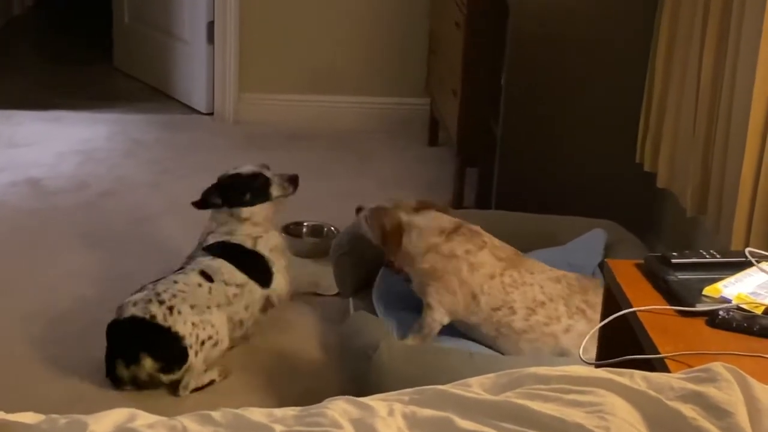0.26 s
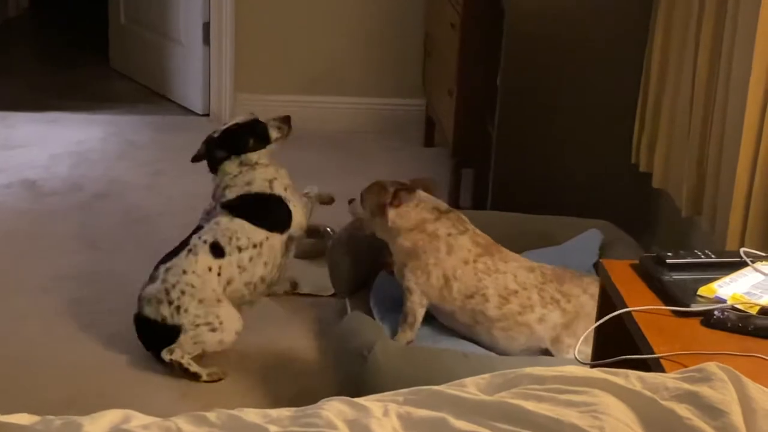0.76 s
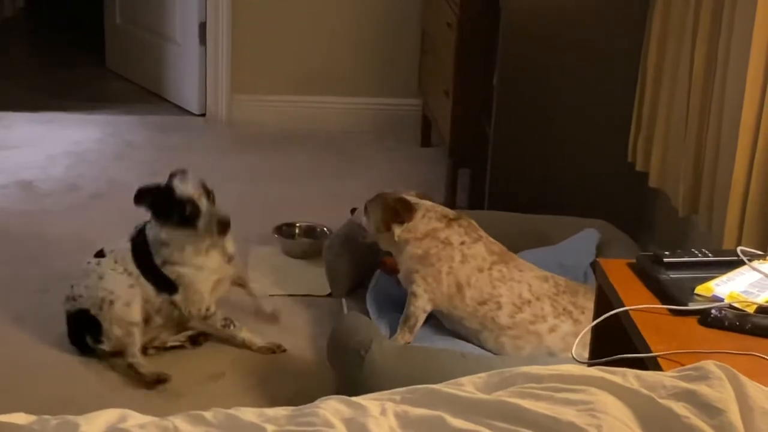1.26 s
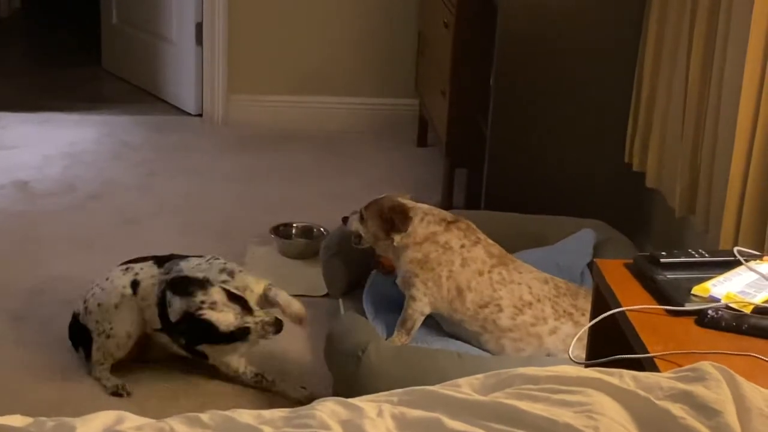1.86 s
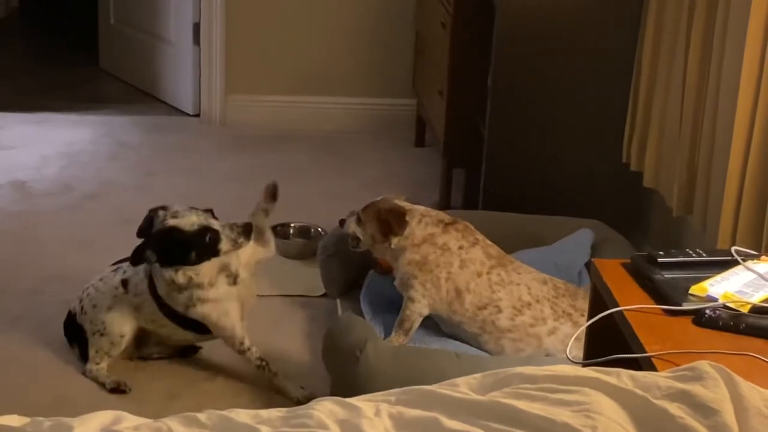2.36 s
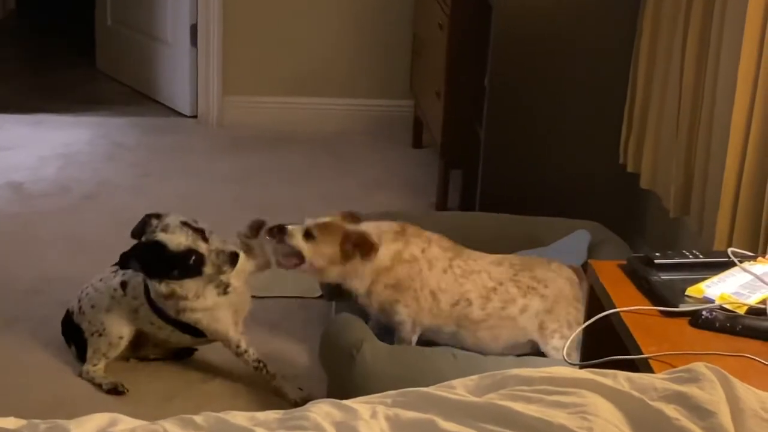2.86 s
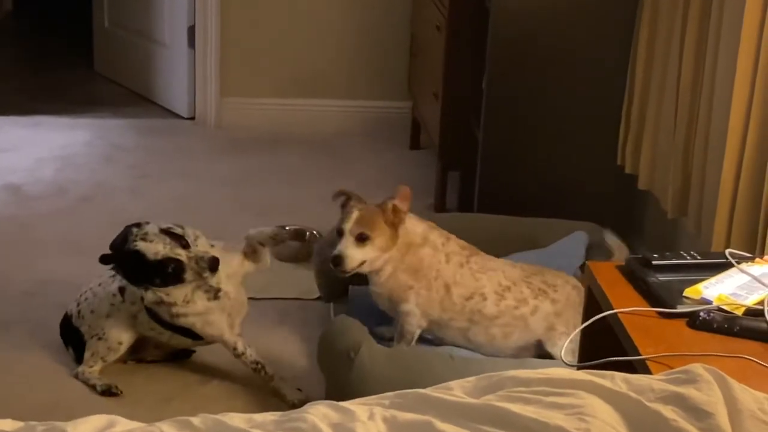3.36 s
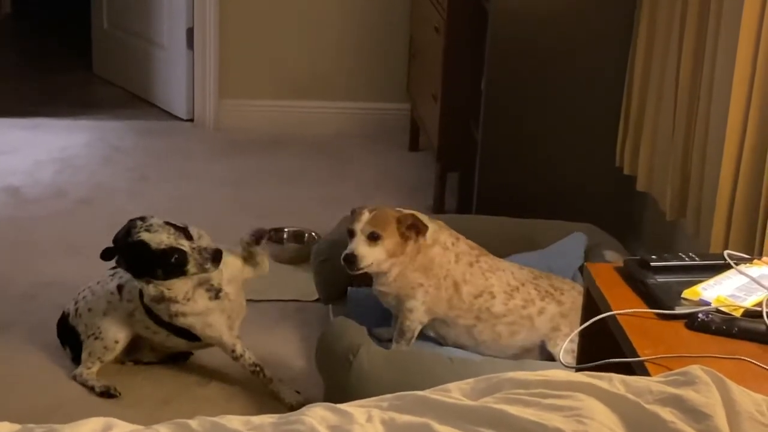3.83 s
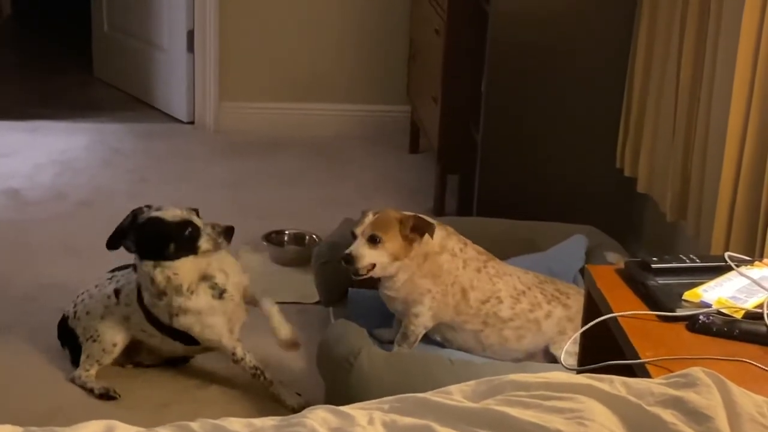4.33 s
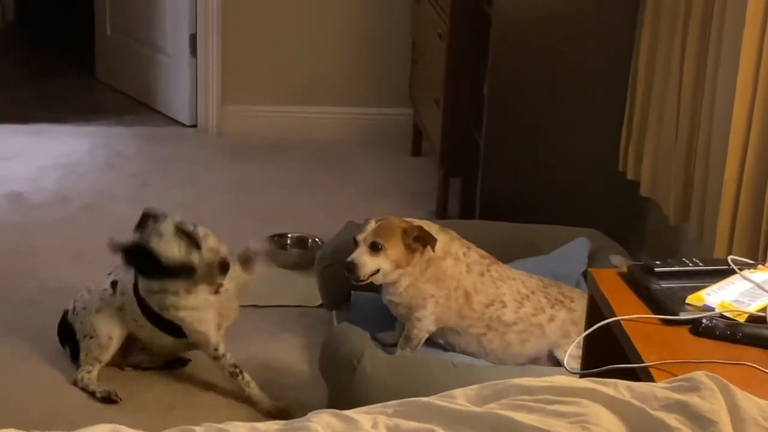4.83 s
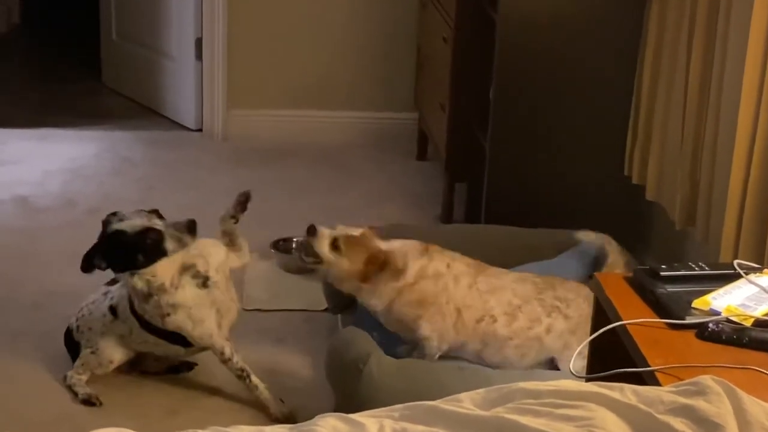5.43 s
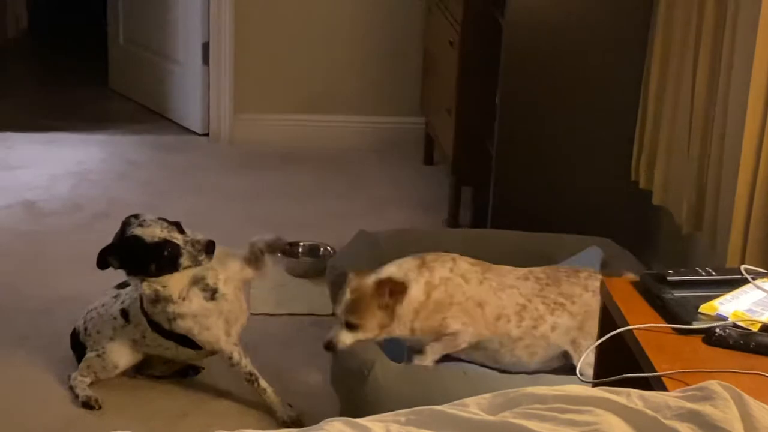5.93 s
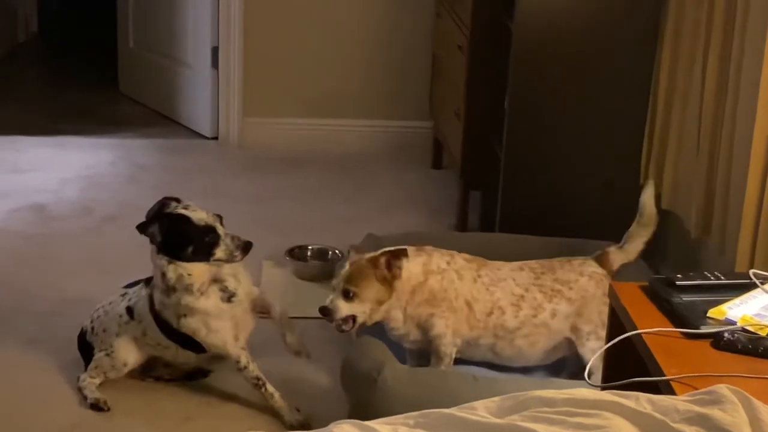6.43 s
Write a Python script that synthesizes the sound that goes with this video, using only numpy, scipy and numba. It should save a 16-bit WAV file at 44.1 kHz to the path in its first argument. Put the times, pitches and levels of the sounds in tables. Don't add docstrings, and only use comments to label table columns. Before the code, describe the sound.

Two small dogs play-fight indoors: sharp raspy yaps in a pair, then singly, over throaty rattling growls, nasal snorts, clicking teeth and dull floor thuds.

```python
import sys
import numpy as np
from scipy import signal
from scipy.fft import rfft, irfft, next_fast_len
from scipy.io import wavfile
from scipy.ndimage import uniform_filter1d
from numba import njit

SR = 44100
rng = np.random.default_rng(int(sys.argv[2]) if len(sys.argv) > 2 else 0)


def master(y):
    cut = np.clip(np.atleast_2d(y).T, -1, 1)
    pcm = np.round(cut * 32767)
    wavfile.write(sys.argv[1], SR, pcm.astype(np.int16))


def volts_from_db(level):
    exponent = np.asarray(level, float) / 20
    return 10 ** exponent


N = 295029

# [t/s, pitch f/Hz, level/dB, mouth f/Hz, lip f/Hz]
YAPS = [
    [(.112, 447.3, -45.5, 1150, 1750), (.14, 526.6, -13.5, 1150, 1840), (.155, 586.6, -12, 1190, 1670),
     (.172, 642, -8.5, 1170, 1650), (.19, 665.5, -15.5, 945, 1990), (.212, 680, -17, 930, 1680),
     (.232, 684, -27, 900, 1720), (.275, 476, -34, 520, 1770)],
    [(.382, 400, -37, 1100, 1483), (.408, 495.6, -23, 980, 1438), (.425, 576, -19, 1150, 1690),
     (.441, 593.6, -11.5, 1840, 1790), (.449, 622.3, -21.5, 1260, 1844), (.46, 653, -12, 1310, 2120),
     (.49, 688.5, -19.5, 1330, 2060), (.54, 499, -40.5, 586, 1620)],
    [(2.364, 481.4, -40, 950, 2120), (2.386, 539, -20, 1080, 2250), (2.413, 616.5, -11.5, 1214, 1820),
     (2.424, 631, -17, 1258, 2410), (2.438, 663.7, -15, 1050, 1980), (2.46, 729, -17.5, 1374, 1820),
     (2.48, 691.3, -25.5, 694, 2150), (2.52, 479, -28.5, 520, 2150)],
    [(3.038, 327, -52.5, 1000, 1980), (3.05, 340, -30.5, 990, 1990), (3.066, 462, -26, 970, 2000),
     (3.085, 595.5, -27.5, 580, 2340), (3.113, 808.4, -14, 830, 2340), (3.122, 851, -18.5, 850, 1570),
     (3.137, 943, -21.5, 930, 2380), (3.152, 996, -25.5, 960, 2380), (3.18, 1000, -28.5, 990, 2380)],
    [(5.078, 430.4, -50.5, 990, 2000), (5.097, 461, -25, 1010, 2000), (5.12, 570.5, -9.5, 1130, 2410),
     (5.134, 630.7, -15, 1208, 1870), (5.149, 652, -9, 965, 2230), (5.166, 696, -18.5, 1410, 1740),
     (5.19, 732, -16.5, 710, 1800), (5.24, 498, -38.5, 520, 2150)],
]
# [f/Hz, level/dB]
YAP_THROAT_DB = [(150, -65), (250, -30.5), (340, -31.5), (687, -5.5), (984, -9), (2090, -10), (2650, -18),
                 (3000, -30), (4800, -44), (7180, -37), (9450, -51), (15000, -45)]
# [t/s, width/s, half-pitch level/dB elsewhere, level/dB at break]
YAP_BREAKS = [(0.194, 0.066, -13.5, 0), (0.466, 0.021, -12.5, -6), (2.436, 0.014, -19.5, 0),
              (3.091, 0.02, -5.5, -31), (5.151, 0.021, -15.5, 10.5)]
# [start/dB per octave, loudest/dB per octave, end/dB per octave, cleanest rasp/dB]
YAP_JAWS = [(-2, 3, -7, -11), (-14.5, -0.5, -6, -9), (-15.5, 4, -8.5, -8), (-20, -9.5, -2.5, -10),
            (-3.5, 0, 5, -12.5)]
# [start f/Hz, end f/Hz, level/dB]
YAP_HISS = [(4308, 5600, -34), (5000, 7000, -29.5), (6500, 8400, -34.5), (3050, 4600, -32),
            (6480, 9000, -36)]
# [onset of singing/s, lip lift/0-4, lip breath level/dB]
YAP_HOARSE = [(0.044, 1.9, -20.5), (0.039, 1.95, -19.5), (0.025, 1.5, -15.5), (0.033, 1.2, -11),
              (0.017, 1.6, -19)]
RASP_START_DB, RASP_END_DB, CLEANEST_SHARE = 0.26, 1, 0.51

# [t/s, level/dB, lips drawn back/0-1]
GROWLS = [
    [(0, -61.5, 0), (.11, -50, 0.26)],
    [(.95, -87, 0.03), (1.06, -65.5, 0), (1.13, -54, 0.44), (1.27, -59, 0.03), (1.5, -64.5, 0.88),
     (1.9, -57.5, 0.89), (2.38, -56.5, 0.98)],
    [(2.75, -56, 0), (2.87, -61, 0.01), (3.03, -62.5, 0)],
    [(3.645, -97, 0.66), (3.67, -61, 0.91), (3.78, -92, 0.77)],
    [(4.42, -64.5, 0.63), (4.52, -61, 0.26), (4.6, -76, 0.35)],
    [(4.6, -87, 0), (4.66, -59, 0.36), (5.0, -61.5, 0.57), (5.07, -42, 0.15)],
    [(5.752, -66, 0.03), (5.79, -49, 0), (5.9, -73, 0.95), (6.08, -71.5, 1)],
    [(6.24, -65.5, 0.66), (6.5, -61, 0.22), (6.62, -90.5, 0.28)],
    [(6.65, -76, 0.28), (6.69, -45, 0.74)],
    [(.22, -69, .1), (.6, -55, 0.2), (1.0, -92.5, .1)],
    [(2.45, -65, 0.3), (2.6, -46, .1), (2.76, -82, 0.3)],
]
# [mouth f/Hz, throat level/dB, muzzle level/dB, teeth level/dB, flutter/0-1]
GROWL_POSTURES = [(910, -44, -12.5, -17, 0.7), (836, -64, -6.5, -23.5, 0), (990, -64, -4, -6, 0.05),
                  (830, -61, -15, -28, 0.13), (905, -74.5, -10, -26, 0.48), (887, -64, -32, -21.5, 1),
                  (813, -54.5, -21, -16.5, 0), (1080, -89.5, -6.5, -20.5, 0.28),
                  (900, -57.5, -31, -34, 0.5), (880, -62.5, -11.5, -26.5, 0.6),
                  (892, -58, -11.5, -19.5, 0.1)]
GROWL_THROAT_HZ = [290, 398, 400, 381, 386, 400, 400, 388, 385, 329.4, 340]
# [t/s, f/Hz]
MUZZLE_HZ = [(0, 2230), (1.1, 2320), (1.451, 2358), (1.72, 2410), (1.95, 2640), (2.35, 2660), (2.8, 2020),
             (3.1, 2020), (3.66, 2660), (4.45, 2296), (4.56, 2377), (5.0, 2310), (5.78, 2088), (6.08, 2434),
             (6.25, 2335), (6.5, 2153), (6.69, 2200)]
# [f/Hz, width/Hz, level/dB]
TEETH = [(3700, 1400, -2), (3600, 500, -3), (4280, 200, -5.5), (5130, 150, -4), (8060, 1200, -6.5),
         (11300, 1300, -15.5), (14800, 1500, -14.5)]
THROAT_FOLLOWS, LIPS_DB = 0.057, 15.5

# [first t/s, last t/s, rate/Hz, first level/dB, last level/dB]
FLUTTERS = [(2.745, 2.978, 19.4, -49.5, -56.5), (3.674, 3.762, 28, -53, -52),
            (3.824, 3.908, 21, -49.5, -57), (5.334, 5.399, 19, -47.5, -38), (5.45, 5.566, 19, -40, -54),
            (5.653, 5.693, 31, -55, -73), (5.772, 5.819, 21, -42.5, -39),
            (5.913, 6.078, 21.7, -42.5, -50.5), (6.129, 6.229, 23, -37, -60), (6.482, 6.58, 22, -56.5, -68)]
# [t/s, level/dB]
FLAPS = [(1.112, -43), (1.178, -48.5), (1.222, -51), (1.279, -46.5), (1.333, -46), (1.384, -44),
         (1.435, -47), (1.485, -46.5), (1.524, -46.5), (1.55, -57.5), (1.59, -46.5), (1.637, -46),
         (1.696, -47), (1.746, -47.5), (1.79, -50), (1.849, -50), (1.893, -48.5), (1.937, -51),
         (1.982, -54), (2.04, -48), (2.092, -47), (2.14, -49), (2.191, -46.5), (2.244, -45), (2.298, -47),
         (2.339, -52.5), (4.652, -50), (4.699, -49), (4.744, -45), (4.784, -48), (4.837, -48), (4.884, -46),
         (4.924, -48.5), (4.971, -51), (5.014, -48)]
# [t/s, level/dB]
GRUNTS = [(.128, -42), (0.383, -41), (0.617, -52), (0.743, -46), (.866, -63.5), (1.061, -54.5),
          (2.376, -42.5), (2.638, -48), (3.051, -50), (3.137, -70), (3.181, -52.5), (4.526, -62),
          (4.624, -57.5), (5.094, -41.5), (6.684, -50.5)]
# [t/s, f/Hz]
CHEST_HZ = [(0, 167.9), (1.1, 143.7), (1.216, 182.1), (1.331, 157.2), (1.5, 146.5), (1.8, 157),
            (2.381, 165.8), (2.759, 135), (3.2, 148.3), (3.801, 137.6), (4.628, 147.4), (5.05, 152),
            (5.389, 165.5), (5.463, 124.6), (5.772, 119.8), (5.908, 219.6), (6.04, 140.1), (6.69, 131.5)]
# [t/s, share/0-1]
RATTLE_SHARE = [(0, .15), (1.05, .3), (1.25, .1), (2.35, .15), (3.2, .35), (4.6, .15), (5.1, .15),
                (5.7, .3), (5.8, .42), (6.1, .4), (6.3, .3), (6.69, .3)]
FLAP_JITTER_S, FLAP_SPREAD_DB = .002, 1.5
OPEN_S, FLAP_KNOCK = .029, 9.8
HUM_SHARE = .1

# [peak t/s, level/dB, 20 dB rise/s, 20 dB fall/s, brightness/dB up above 1700 Hz and down
SNORTS = [
    (.76, -48.5, 0.083, 0.043, -4.5),
    (1.1, -62, 0.073, 0.44, 1),
    (3.83, -36.5, 0.052, 0.072, 5),
    (4.55, -68, 0.23, 0.089, 10),
    (5.082, -48, 0.056, 0.042, -1),
    (5.5, -52.5, 0.36, 0.13, -8),
    (5.665, -53.5, .15, 0.15, 1),
    (5.798, -54, 0.084, 0.11, 7),
    (6.139, -34.5, 0.056, 0.05, 3),
]
# [lower f/Hz, upper f/Hz, lift/dB]
NOSTRILS = [(1602, 5080, 4), (1650, 4930, 11), (1690, 4540, 2), (1650, 4900, -5), (1670, 7300, -9.5),
            (1640, 2080, 6.5), (1670, 5500, -4), (1150, 2900, 7.5), (1200, 1960, 1.5)]
# [f/Hz, level/dB per Hz]
NOSE_DB = [(200, -21), (400, -5), (800, -3.5), (1200, -3.5), (1700, -6), (2200, -6), (2800, -8),
           (4700, -10), (6000, -12.5), (8000, -18), (11000, -21), (15000, -39)]
# [t/s, pitch f/Hz, level/dB, width/Hz]
WHISTLES = [
    [(1.04, 5100, -78, 350), (1.14, 5420, -74, 350), (1.47, 5400, -86, 350)],
    [(1.08, 4500, -80, 350), (1.19, 4550, -75, 350), (1.3, 4500, -86, 350)],
    [(4.63, 4130, -91, 78), (4.682, 4120, -67.5, 78), (4.77, 4070, -77.5, 78)],
    [(5.02, 3790, -78.5, 78), (5.036, 4200, -72, 78), (5.09, 3989, -68, 78)],
]
SNORT_RANGE_DB, SNORT_DULLS = 30, 0.27

# [t/s, level/dB, pitch f/Hz, ring/ms, crack level/dB]
SNAPS = [
    (0.64, -44, 2127, 23, -12),
    (2.661, -23, 2950, 7.9, -8),
    (2.72, -34, 2204, 10.7, -21.5),
    (2.846, -26.5, 3003, 10, -6.5),
    (2.851, -26.5, 780, 15, -28.5),
    (4.611, -47.5, 1040, 32, -9),
    (4.765, -52.5, 1687, 38, -16.5),
    (5.492, -28, 3160, 6.3, -15.5),
    (5.504, -37, 4530, 7.8, -19),
    (5.764, -51, 965, 13, -7),
]

# [t/s, level/dB]
RUMBLE_DB = [(0.0, -66), (1.12, -63.5), (2.1, -67.5), (2.76, -60.5), (3.22, -63.5), (3.48, -86),
             (3.87, -53.5), (4.1, -92), (4.42, -85.5), (4.55, -60.5), (5.18, -69), (5.23, -67), (5.79, -55),
             (5.98, -63.5), (6.17, -47), (6.39, -83), (6.56, -56.5), (6.69, -83.5)]
# [f/Hz, level/dB]
THUMP_DB = [(15, -45.0), (30, -16), (50, -7.5), (66, -3.5), (100, 5.0), (130, -44.5), (300, -87.5)]
# [f/Hz, level/dB per Hz]
HUSH_SPECTRUM_DB = [(24, -29), (40, 0), (70, -0.5), (110, -7.5), (233, -8), (355, -12.5), (676, -18),
                    (956, -13.5), (1260, -24), (2520, -22.5), (4340, -31), (15000, -47)]
HUSH_DB = -72.5

# [f/Hz, T60/s]
ROOM_T60_S = [(100, 0.94), (300, 1), (700, 0.62), (1400, 0.63), (3500, 0.61), (8000, 0.62), (15000, 0.76)]
# [f/Hz, side level/dB]
ROOM_SIDE_DB = [(60, -15.5), (200, -11.5), (400, -8.5), (800, -6), (1400, -6), (2500, -13), (4400, -34),
                (7000, -31.5), (10000, -13)]
# [f/Hz, level/dB, T60/s]
ROOM_MODES = [(687, -73.5, 0.89), (800, -75.5, 0.53), (965, -74.5, 0.65), (1326, -75.5, 1),
              (1430, -75.5, .7), (1690, -73.5, 0.97), (1790, -73.5, .7), (2060, -76.5, 0.6),
              (2150, -73.5, .65), (2380, -75.5, 0.74)]
MODE_BLUR_HZ = 10

TURN_FROM_HZ, TURN_HZ, CUTOFF_HZ = 6950, 4320, 16000


def at_hz(points, hz):
    p = np.array(points)
    return np.interp(np.log(np.maximum(hz, 1)), np.log(p[:, 0]), p[:, 1])


def rms_one(x):
    return x / np.sqrt(np.mean(x ** 2) + 1e-20)


def span(rows, fade_s=.01):
    s, *columns = np.transpose(rows)
    start = round(s[0] * SR)
    t = np.arange(start, min(round(s[-1] * SR), N)) / SR
    gate = np.clip(np.minimum(t - s[0], s[-1] - t) / fade_s, 0, 1)
    return slice(start, start + len(t)), gate, [np.interp(t, s, c) for c in columns]


def butter(x, order, hz, kind="low"):
    return signal.sosfilt(signal.butter(order, hz, kind, fs=SR, output="sos"), x)


def coloured(points, size):
    hz = np.fft.rfftfreq(size, 1 / SR)
    gain = volts_from_db(at_hz(points, np.minimum(hz, 12000)))
    return rms_one(irfft(rfft(rng.standard_normal(size)) * gain, size))


def tilted(x, shelf_db, pivot_hz):
    low = butter(x, 1, pivot_hz)
    return low * volts_from_db(-shelf_db) + (x - low) * volts_from_db(shelf_db)


def drift(size, rate_hz):
    r = np.exp(-2 * np.pi * rate_hz / SR)
    return rms_one(signal.lfilter([1], [1, -2 * r, r * r], rng.standard_normal(size + 2000))[2000:])


@njit
def resonate(x, hz, width_hz, sr):
    y, r = np.zeros(len(x)), np.exp(-np.pi * width_hz / sr)
    for i in range(2, len(x)):
        drive = (1 - r * r) / 2 * (x[i] - x[i - 2])
        y[i] = drive + 2 * r * np.cos(2 * np.pi * hz[i] / sr) * y[i - 1] - r * r * y[i - 2]
    return y


def formant(x, hz, width_hz):
    hz = hz + np.zeros(len(x))
    return resonate(resonate(x, hz, float(width_hz), SR), hz, float(width_hz), SR)


def background():
    at, gate, (level_db,) = span(RUMBLE_DB, fade_s=1e-4)
    lumps = np.zeros(N)
    lumps[at] = volts_from_db(level_db) * coloured(THUMP_DB, len(gate))
    side = volts_from_db(HUSH_DB - 12.5) * coloured(HUSH_SPECTRUM_DB, N) + .06 * np.roll(lumps, 300)
    return lumps + volts_from_db(HUSH_DB) * coloured(HUSH_SPECTRUM_DB, N) + side * np.array([[1], [-1]])


def growl(opens, opened):
    cycle = np.cumsum(120 * (1 + .2 * drift(N, 60))) / SR
    pulses = np.diff(np.floor(cycle), prepend=0) * volts_from_db(3.0 * rng.standard_normal(N))
    source = rms_one(pulses) + 1.3 * rng.standard_normal(N)
    clicked = source + 45 * opens
    out = np.zeros(N)
    for rows, posture, throat_hz in zip(GROWLS, GROWL_POSTURES, GROWL_THROAT_HZ):
        mouth_hz, throat_db, muzzle_db, teeth_db, flutter = posture
        at, gate, (level_db, lips) = span(rows, fade_s=0.0049)
        size, air = len(gate), source[at]
        throat_db = throat_db + THROAT_FOLLOWS * (level_db - level_db.max()) - level_db
        muzzle_hz = np.interp(np.arange(at.start, at.stop) / SR, *np.transpose(MUZZLE_HZ))
        teeth_db = teeth_db + LIPS_DB * lips
        flutter = np.clip(flutter, 0, .95)
        valve = 1 - flutter + 2.5 * flutter * opened[at]

        knocked = air + FLAP_KNOCK * flutter * opens[at]
        mouth = formant(knocked, mouth_hz, 240 - 140 * flutter)
        mouth = rms_one(mouth + (1 - flutter) ** 2 * .8 * formant(air, .78 * mouth_hz, 750))
        mouth = butter(mouth, 4, 1400)

        throat = formant(air, throat_hz * (1 + 0.026 * drift(size, 4.8)), 80) * volts_from_db(2 * drift(size, 5.8))
        throat = rms_one(throat + 0.69 * formant(air, 210, 190) + 0.21 * formant(air, 500, 310))

        muzzle = formant(air, muzzle_hz * (1 + 0.013 * drift(size, 11)), 400) * volts_from_db(1.5 * drift(size, 15))
        muzzle = rms_one(muzzle + 0.37 * formant(air, 0.86 * muzzle_hz, 920))

        teeth = sum(volts_from_db(db + 2.5 * drift(size, 6)) * formant(clicked[at], hz, width_hz)
                    for hz, width_hz, db in TEETH)
        teeth = butter(teeth, 3, [5700, 7400], "bandstop")
        teeth = rms_one(butter(teeth, 5, 3000, "high"))

        voice = valve * (mouth + volts_from_db(throat_db) * throat)
        voice = voice + volts_from_db(muzzle_db - 2.5 * lips + 1.0) * muzzle + volts_from_db(teeth_db) * teeth
        out[at] += gate * volts_from_db(level_db - 1.5) * voice
    return out


def yaps():
    out = np.zeros(N)
    for rows, brk, jaw, hiss, hoarse in zip(YAPS, YAP_BREAKS, YAP_JAWS, YAP_HISS, YAP_HOARSE):
        break_s, break_width_s, plain_db, broken_db = brk
        *jaw_db, clean_db = jaw
        *hiss_hz, hiss_db = hiss
        sing_s, lip_lift, breath_db = hoarse
        at, gate, (hz, level_db, mouth_hz, lip_hz) = span(rows, fade_s=.008)
        size = len(hz)
        hz = uniform_filter1d(hz, size=420, mode="nearest")
        t, part = np.arange(at.start, at.stop) / SR, np.linspace(0, 1, size)
        half_db = plain_db + (broken_db - plain_db) * np.exp(-((t - break_s) / break_width_s) ** 2)
        open_db = np.interp(part, [0, part[np.argmax(level_db)], 1], jaw_db)
        rasp_db = np.interp(part, [0, CLEANEST_SHARE, 1], [RASP_START_DB, clean_db, RASP_END_DB])
        half_turn = np.cumsum(np.pi * hz * (1 + .003 * drift(size, 90))) / SR

        lines, power = 0, 0
        for k in range(1, 25):
            line_hz = k * hz / 2
            tilt_db = open_db * np.log2(line_hz / 1000)
            gain = volts_from_db(at_hz(YAP_THROAT_DB, line_hz) + half_db * (k % 2) + tilt_db)
            mouth_lift = 2.8 / (1 + ((line_hz - mouth_hz) / 130) ** 2)
            gain = gain * (1 + mouth_lift + lip_lift / (1 + ((line_hz - lip_hz) / 120) ** 2))
            gain = gain * volts_from_db(2 * drift(size, 62))
            lines = lines + gain * np.sin(k * half_turn + 2 * np.pi * rng.random())
            power = power + gain ** 2 / 2

        puffs = coloured(YAP_THROAT_DB, size) * (1 + 0.75 * np.cos(2 * half_turn))
        mouth_puffs = 4.6 * formant(puffs, mouth_hz, 180)
        puffs = volts_from_db(0.5 * drift(size, 60)) * tilted(puffs, 21.46, 3000) + mouth_puffs

        sings = np.clip((t - t[0]) / sing_s, 0, 1) ** 2
        breath = rng.standard_normal(size) * volts_from_db(2.2 * drift(size, 120))
        hoarse_air = (1 - sings) * rms_one(formant(breath, mouth_hz, 280))
        hoarse_air = hoarse_air + volts_from_db(breath_db) * rms_one(formant(breath, lip_hz, 210))
        lines = sings * lines + np.sqrt(power) * hoarse_air

        voice = lines / np.sqrt(uniform_filter1d(power, 400))
        voice = voice + volts_from_db(np.minimum(rasp_db, 0) - 18.0) * puffs
        teeth_air = formant(rng.standard_normal(size), np.interp(part, [0, 1], hiss_hz), 900)
        voice = voice + volts_from_db(hiss_db) * rms_one(teeth_air)
        out[at] += gate * volts_from_db(level_db - 0.5) * voice
    return butter(out, 2, 300, "high")


def flaps():
    rows = []
    for first_s, last_s, rate_hz, *ends_db in FLUTTERS:
        for s in np.linspace(first_s, last_s, round((last_s - first_s) * rate_hz) + 1):
            level_db = np.interp(s, [first_s, last_s], ends_db) + FLAP_SPREAD_DB * rng.normal()
            rows.append((s + FLAP_JITTER_S * rng.normal(), level_db))
    return rows + FLAPS + GRUNTS


def throbs():
    swells, opens = np.zeros(N + 8000), np.zeros(N + 8000)
    t = np.arange(-4000, 4000) / SR
    swell = .82 * np.exp(-(t / .0135) ** 2) + .18 * np.exp(-(t / .028) ** 2)
    times = flaps()
    for (s, peak_db), late in zip(times, rng.random(len(times))):
        i = max(round(s * SR) - 4000, 0)
        swells[i:i + 8000] += volts_from_db(peak_db) * swell
        opens[i + 4000 + round(SR * (.004 + .002 * late))] = 1
    opened = signal.fftconvolve(opens, np.exp(-(t[4000:] / OPEN_S) ** 2))[:N]
    swells = (1 - HUM_SHARE) * swells + HUM_SHARE * uniform_filter1d(swells, size=2200)

    at_s = np.arange(N) / SR
    hz = np.interp(at_s, *np.transpose(CHEST_HZ))
    turn = np.cumsum(2 * np.pi * hz * (1 + .022 * drift(N, 30))) / SR
    windpipe = rms_one(formant(rng.standard_normal(N), 180, 97))
    rattle = np.interp(at_s, *np.transpose(RATTLE_SHARE))
    rattling = rms_one(formant(rng.standard_normal(N), 170, 170))
    chest = swells[:N] * ((1 - rattle) * np.sin(turn) + .6 * rattle * rattling + .12 * windpipe)
    return chest, opens[:N], uniform_filter1d(np.clip(opened, 0, 1), size=60)


def snaps():
    out, t = np.zeros(N), np.arange(3000) / SR
    for s, peak_db, hz, ring_ms, crack_db in SNAPS:
        crack = volts_from_db(crack_db) * rng.standard_normal(len(t)) * volts_from_db(-60 * t / 0.011)
        ring = .5 * np.sin(2 * np.pi * hz * t) * volts_from_db(-60000 * t / ring_ms)
        start = round(s * SR)
        out[start:start + len(t)] += volts_from_db(peak_db) * (crack + ring)
    return butter(out, 2, [400, 6500], "band") + .06 * np.diff(out, prepend=0)


def snorts():
    out = np.zeros(N)
    reach = SNORT_RANGE_DB / 20
    for (s, peak_db, rise_s, fall_s, peak_bright_db), (low_hz, high_hz, lift_db) in zip(SNORTS, NOSTRILS):
        low_db = peak_db - SNORT_RANGE_DB
        rows = [(s - reach * rise_s, low_db), (s, peak_db), (s + reach * fall_s, low_db)]
        at, gate, (level_db,) = span(rows)
        level_db = uniform_filter1d(level_db, size=1300, mode="nearest")
        bright_db = peak_bright_db + SNORT_DULLS * (level_db - peak_db)
        air = tilted(coloured(NOSE_DB, len(gate)), bright_db, 1700)
        air = air + volts_from_db(lift_db) * (formant(air, low_hz, 610) + 0.56 * formant(air, high_hz, 1300))
        out[at] += gate * volts_from_db(level_db - 8.0 + 1.6 * drift(len(gate), 70)) * air
    for rows in WHISTLES:
        at, gate, (hz, level_db, width_hz) = span(rows, fade_s=0.012)
        whistle = rms_one(formant(rng.standard_normal(len(hz)), hz, width_hz.mean()))
        out[at] += gate * volts_from_db(level_db) * whistle
    return out


def room(x, wet_db):
    t, tail = np.arange(SR) / SR, 0
    edges_hz = 50 * 2 ** np.arange(0, 8.5, .5)
    for low, high in zip(edges_hz, edges_hz[1:]):
        band = butter(rng.standard_normal((2, SR)), 2, [low, high], "band")
        tail = tail + band * volts_from_db(-60 * t / at_hz(ROOM_T60_S, np.sqrt(low * high)))
    early = 1 + 4.5 * np.exp(-t / 0.016)
    tail = tail * np.clip((t - .003) / 0.0049, 0, 1) * early
    tail = volts_from_db(wet_db) * tail / np.sqrt(np.sum(tail[0] ** 2))
    for hz, level_db, t60_s in ROOM_MODES:
        blur = .75 + .6 * np.array([drift(SR, MODE_BLUR_HZ), drift(SR, MODE_BLUR_HZ)])
        wave = np.sin(2 * np.pi * (hz * t + rng.random((2, 1))))
        tail = tail + blur * volts_from_db(level_db - 60 * t / t60_s) * wave
    size = next_fast_len(N + SR)
    wide = volts_from_db(at_hz(ROOM_SIDE_DB, np.fft.rfftfreq(size, 1 / SR)) + 4.0)
    mid, side = rfft(x, size) * rfft(tail, size)
    mid, side = x + irfft(mid, size)[:N], irfft(side * wide, size)[:N]
    return np.array([mid + side, mid - side])


def scene():
    chest, opens, opened = throbs()
    dogs = yaps() + growl(opens, opened) + snorts() + snaps()
    return room(dogs + 0.64 * chest, wet_db=-6.0) + 0.77 * chest + background()


def top_cut(x):
    return signal.sosfilt(signal.butter(12, 16460, fs=SR, output="sos"), x)


def record(dry):
    level_db = 10 * np.log10(uniform_filter1d(np.mean(dry ** 2, axis=0), size=2000) + 1e-12)
    x = dry * volts_from_db(np.clip(0.3 * (level_db + 53.0), -8.0, 0))
    hz = np.fft.rfftfreq(N, 1 / SR)
    turn = np.pi * np.maximum(hz - TURN_FROM_HZ, 0) / TURN_HZ
    x = irfft(rfft(x) * np.exp(1j * turn * np.array([[-1], [1]])), N)
    x = .97 * np.tanh(x / .97)
    x = signal.sosfilt(signal.cheby2(10, 60, CUTOFF_HZ + 450, fs=SR, output="sos"), x)
    return top_cut(x)


dry = scene()
out = record(dry)
master(out)
```